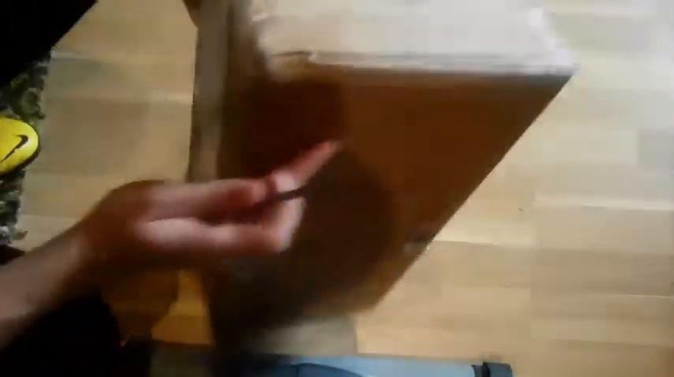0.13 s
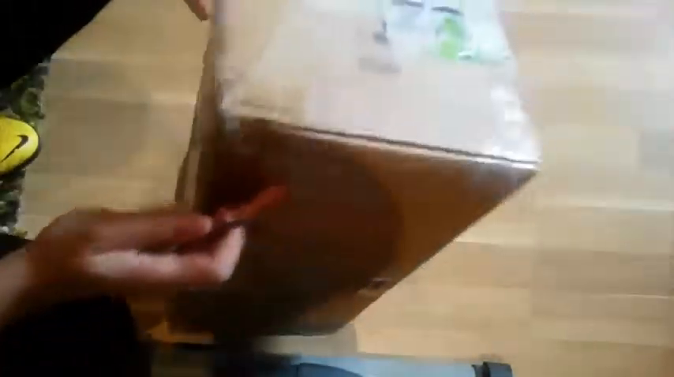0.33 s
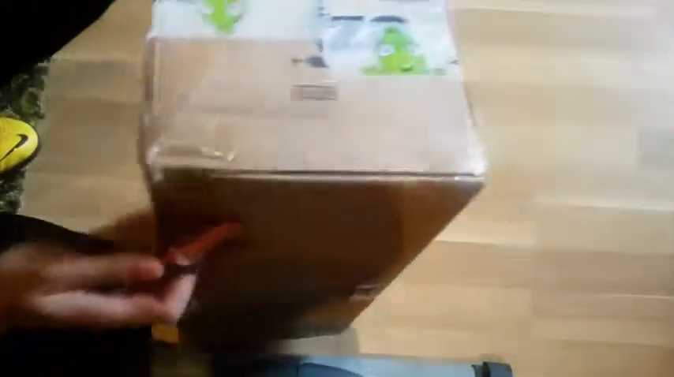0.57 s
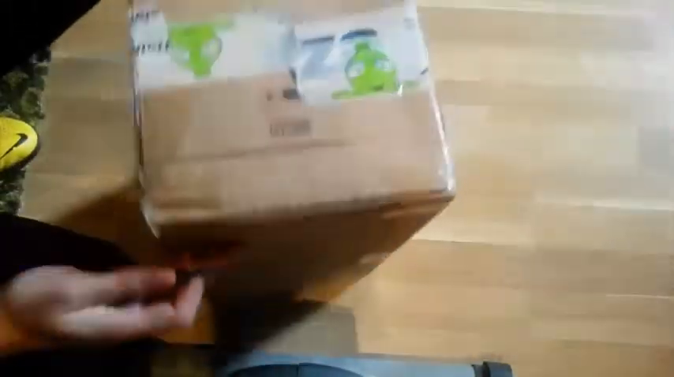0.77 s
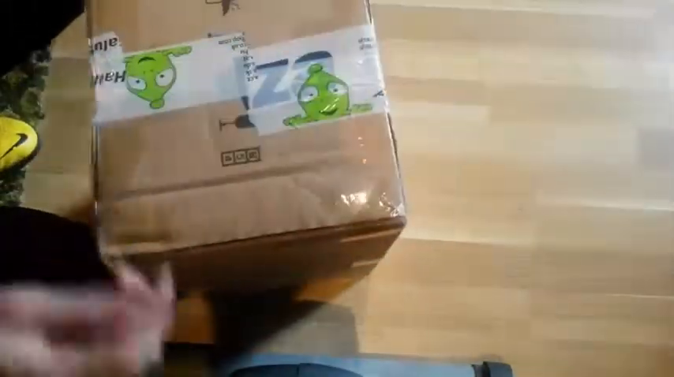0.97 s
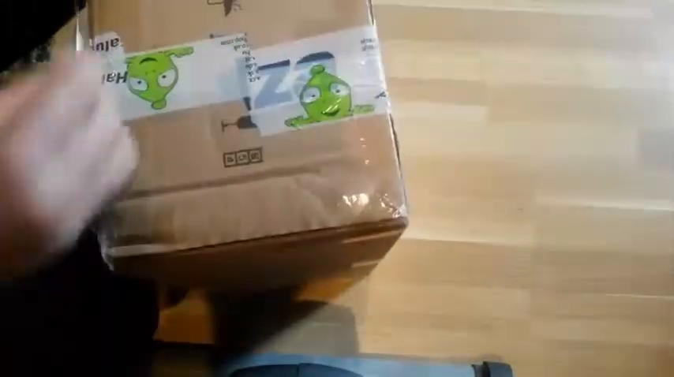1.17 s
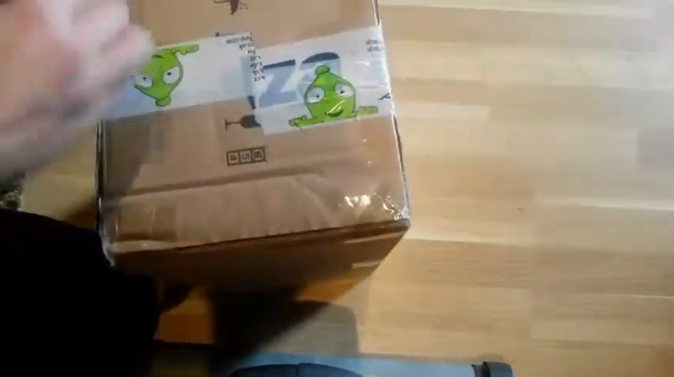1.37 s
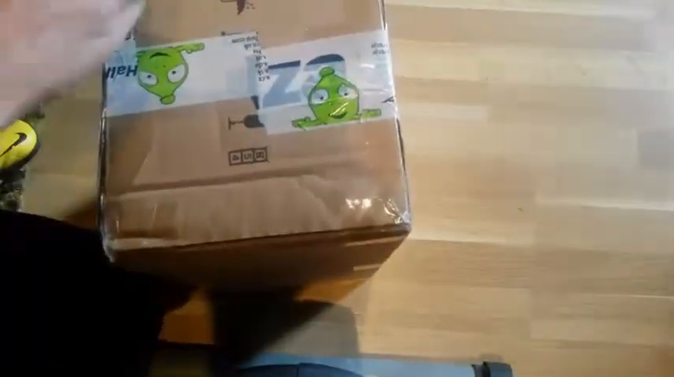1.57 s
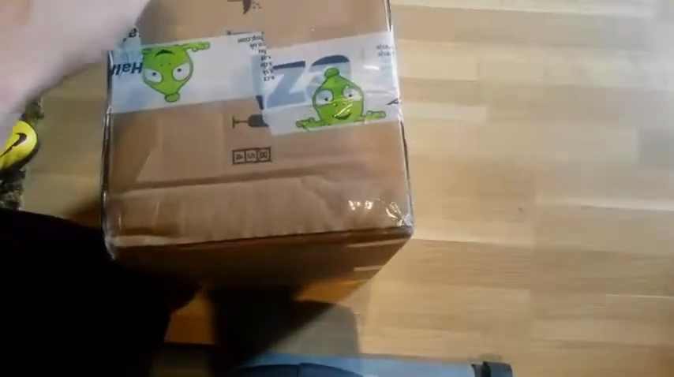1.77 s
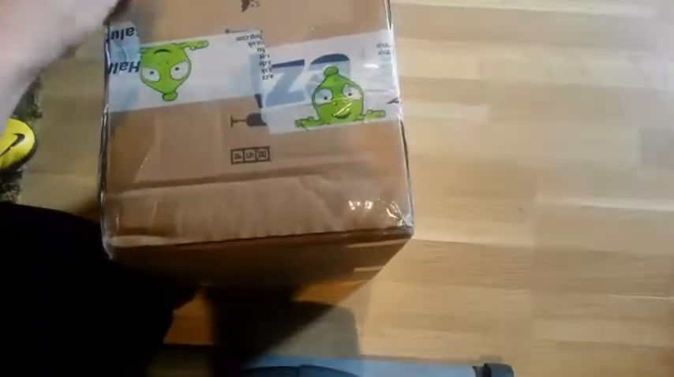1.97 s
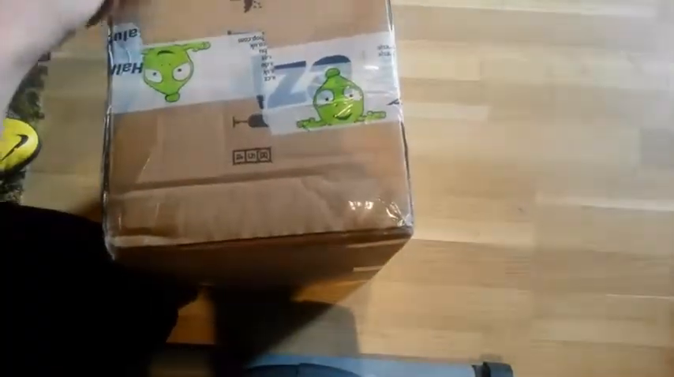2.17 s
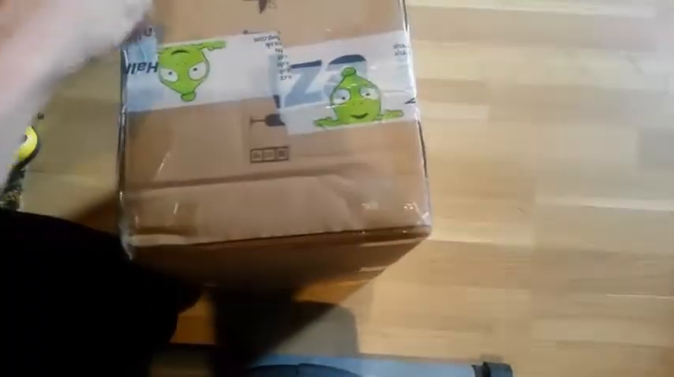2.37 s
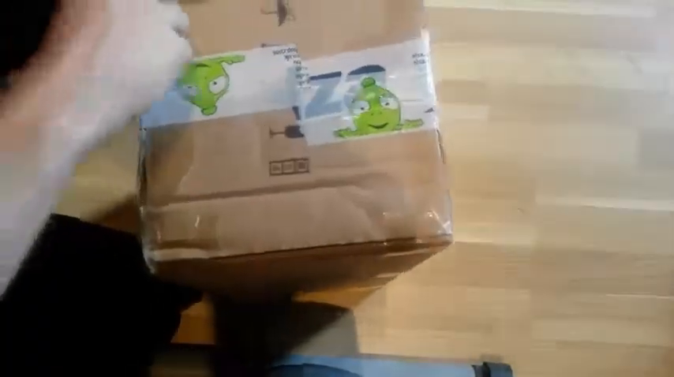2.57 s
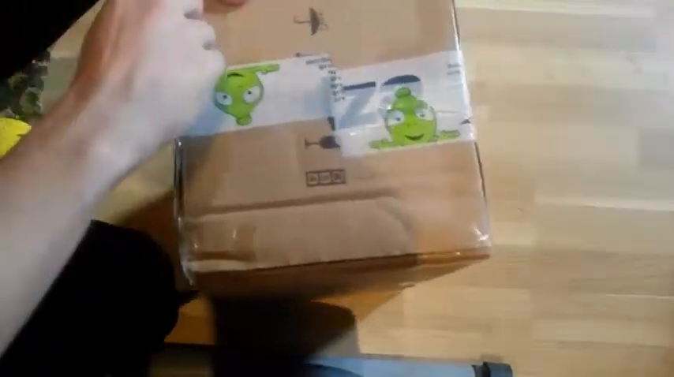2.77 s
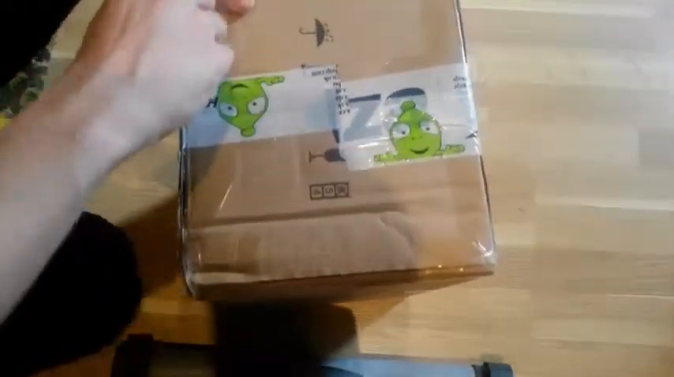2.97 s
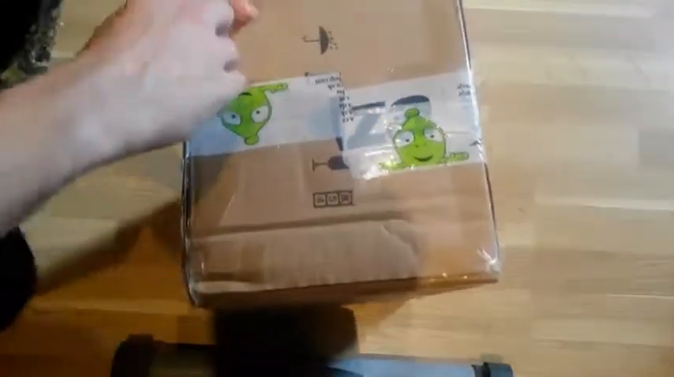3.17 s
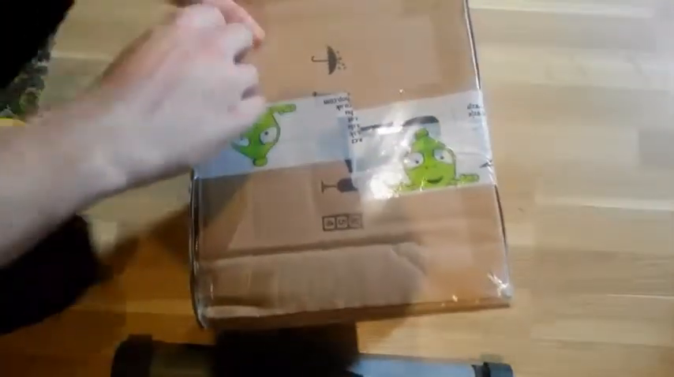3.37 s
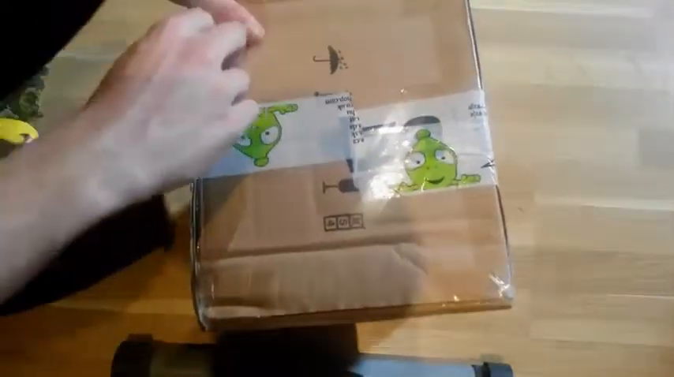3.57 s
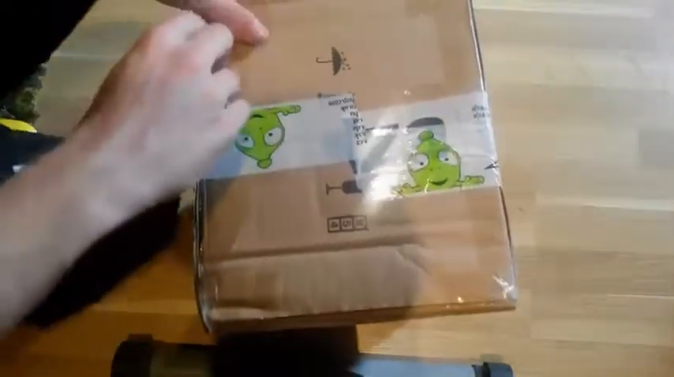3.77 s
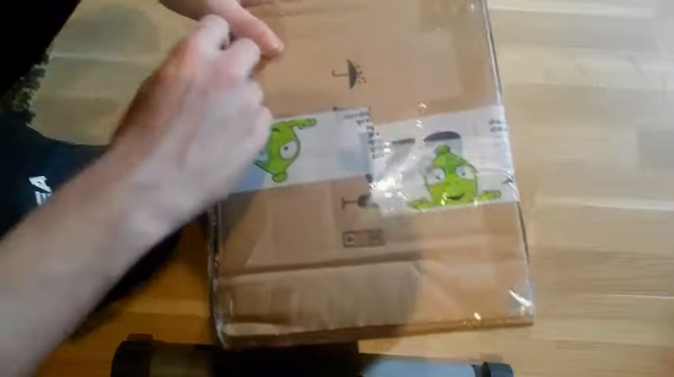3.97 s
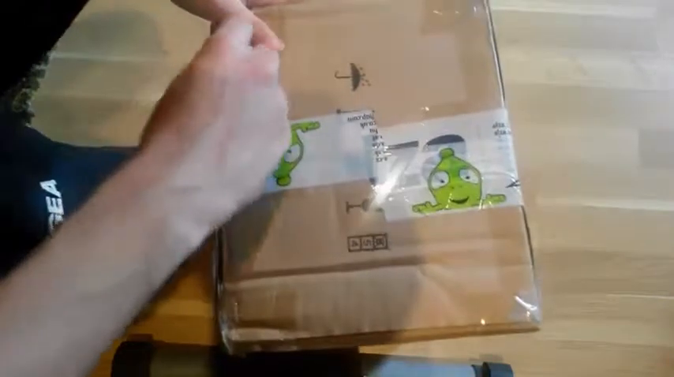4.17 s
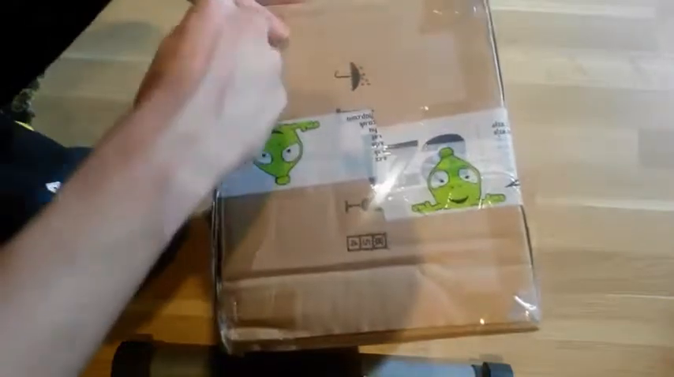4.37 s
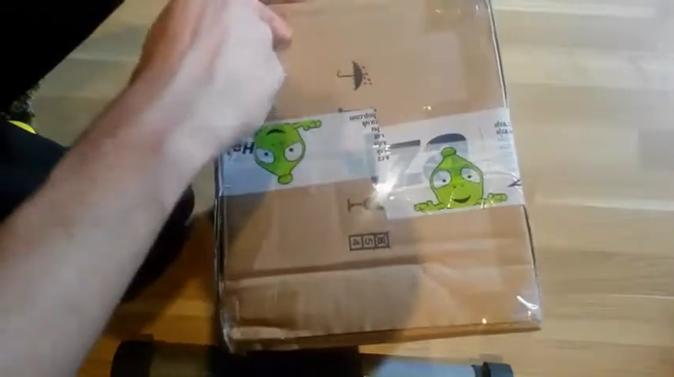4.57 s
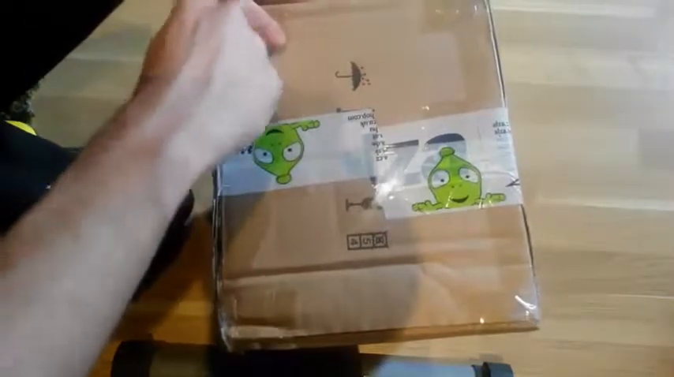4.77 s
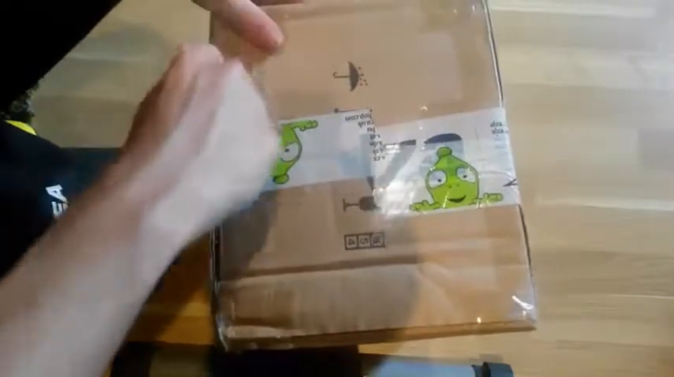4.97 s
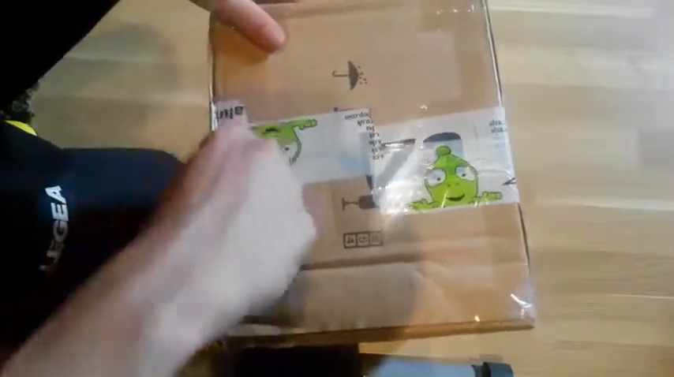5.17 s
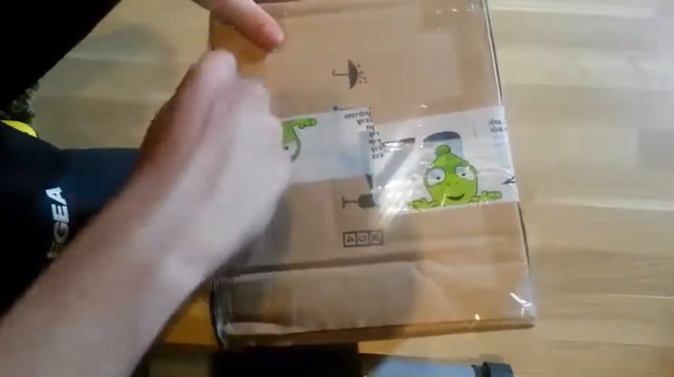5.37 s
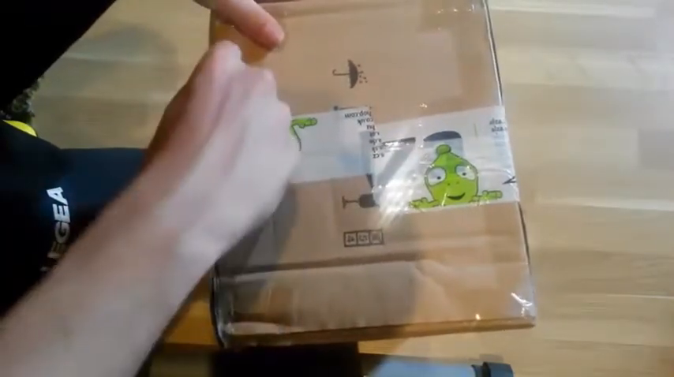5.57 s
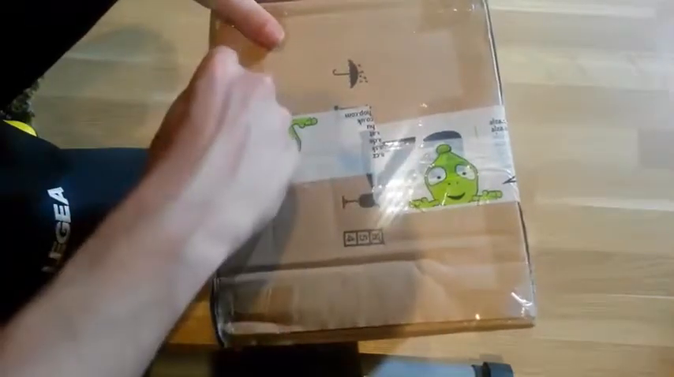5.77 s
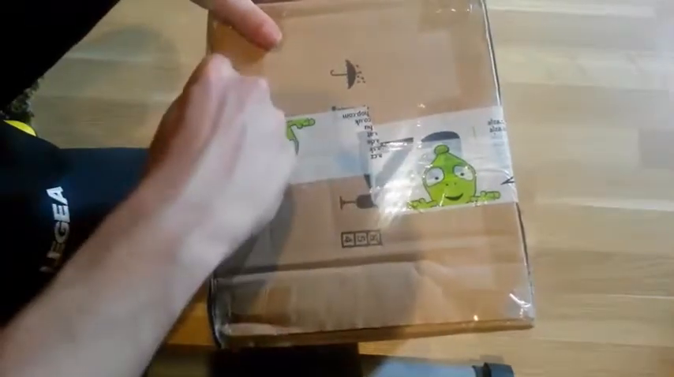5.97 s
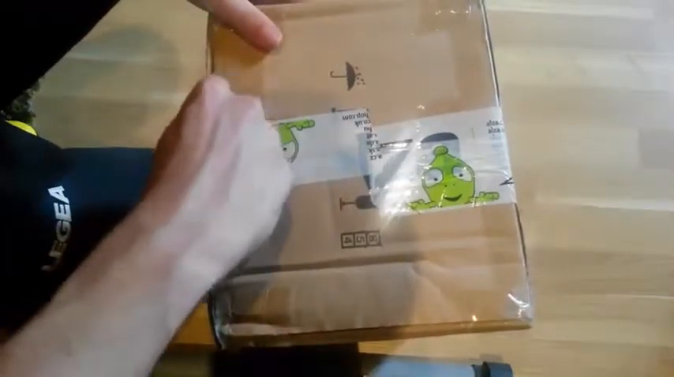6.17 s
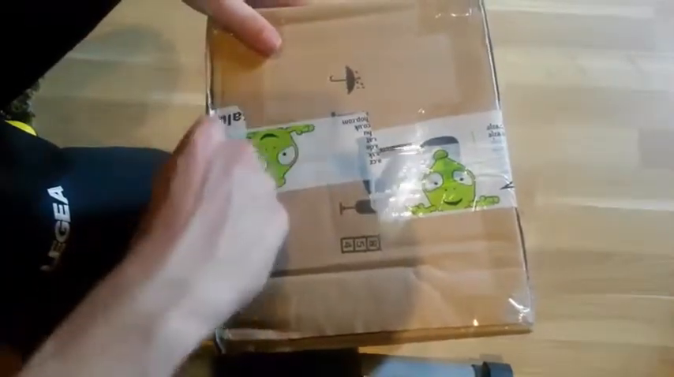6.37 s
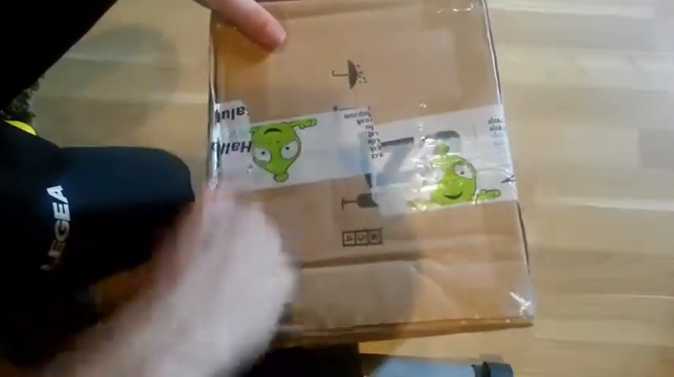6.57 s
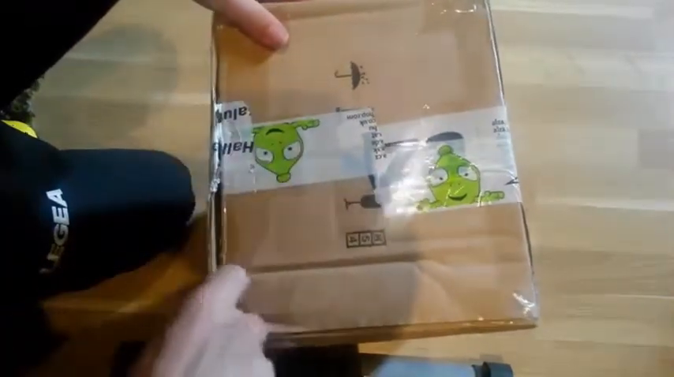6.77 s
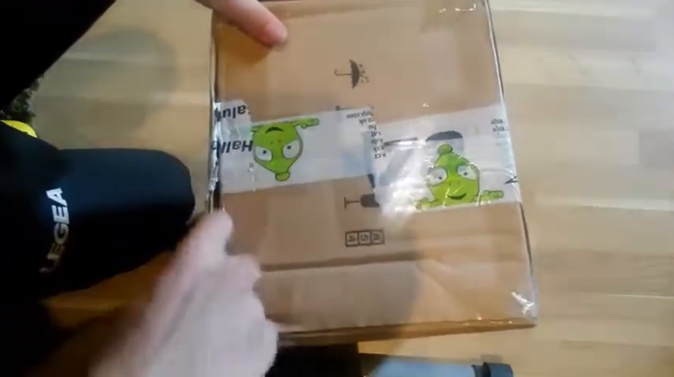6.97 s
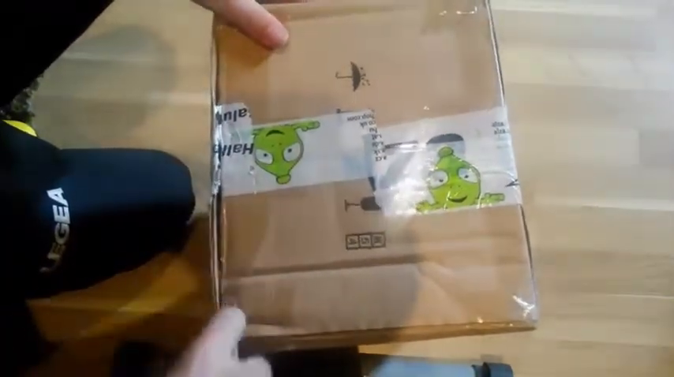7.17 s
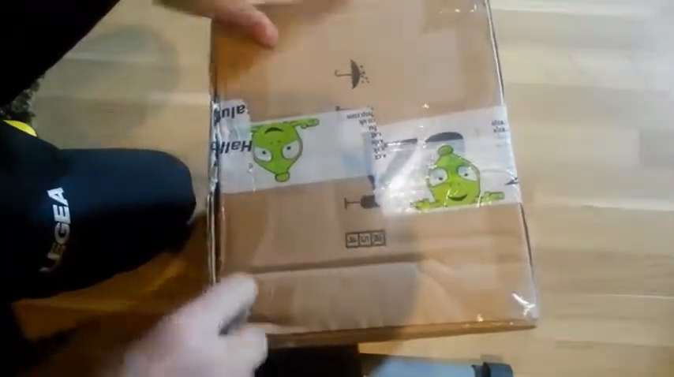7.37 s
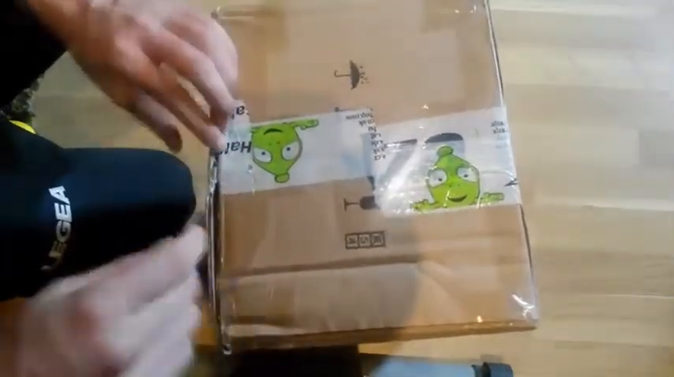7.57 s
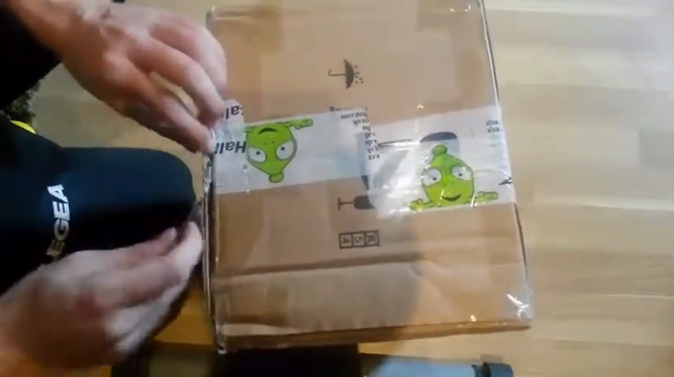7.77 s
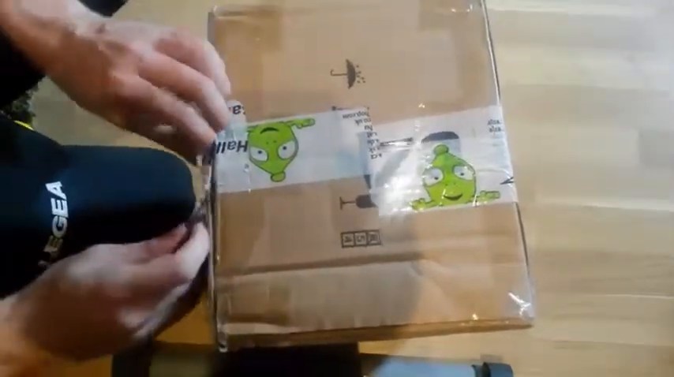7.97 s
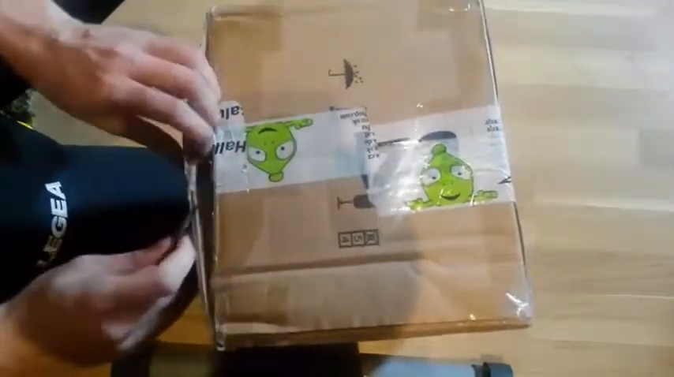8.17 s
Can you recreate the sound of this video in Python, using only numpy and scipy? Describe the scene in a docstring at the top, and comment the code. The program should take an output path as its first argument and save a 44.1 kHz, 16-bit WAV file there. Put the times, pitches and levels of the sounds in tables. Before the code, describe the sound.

A taped cardboard parcel is shoved round on a wooden floor for the first 1.3 seconds, with soft drags, low bumps and small tape snaps. At 1.3 seconds one sharp static pop hits the right side. Hands then sweep faintly over the lid until 4.3 seconds, with a few ticks and one faint squeak near 3.4. Fingers rub and pick at the plastic tape. At 5.2 seconds a small blade rips it in a loud, crackling burst that drums the hollow box, with a brief squeak. More loud rips and snaps come from 6.5 to 6.9 seconds, with a second squeak. Light scraping and clicks follow, then a short rip near 7.6 and sharp snaps around 8.0 and 8.2. The parcel is close and slightly left, in a small, quiet room.

```python
"""A taped cardboard parcel is shoved round on a wooden floor in a small room: drag, bumps, tape snaps.
At 1.3 s one static pop hits the right channel. Hands sweep the lid until 4.3 s, with one faint squeak.
Fingers then rub and pick at the plastic tape. From 5.2 s a small blade rips it in short, crackling
bursts that drum the hollow box and twice set a panel squeaking."""
import sys
import numpy as np
from scipy import signal
from scipy.fft import rfft, irfft, next_fast_len
from scipy.io import wavfile
from scipy.ndimage import map_coordinates

SR = 44100
rng = np.random.default_rng(int(sys.argv[2]) if len(sys.argv) > 2 else 0)


def dump_mix(stems):
    """Bounce the given channels to the path in sys.argv[1] as a 16-bit WAV at rate SR."""
    frames = np.atleast_2d(stems).T  # one column per channel
    limited = np.clip(frames, -1, 1)  # hard clip at full scale
    pcm = np.round(limited * 32767).astype(np.int16)
    wavfile.write(sys.argv[1], SR, pcm)


N = 362943

# Event levels are relative within each source.
# parcel turned on the floor: middle_s, length_s, drag_db, rumble_db
SHOVES = [(.02, 0.46, -47, -50.5), (.23, 0.35, -47, -50), (.39, 0.41, -42.5, -48), (.635, 0.24, -49, -57.5),
          (.785, 0.19, -49, -51.5), (1.01, 0.4, -45.5, -48.5), (1.14, 0.18, -47, -53),
          (1.26, 0.22, -56.5, -58)]
# tape snaps and crinkles: start_s, crack_db, knock_db, tilt_db_per_octave
SNAPS = [(0.097, -42, -38.5, -2), (0.7529, -32, -43, -2), (.765, -35, -55, 3), (0.7847, -32, -50, 6),
         (.8579, -42, -60, -2), (.9085, -47, -38, -3), (1.069, -35, -45.5, 2), (1.1751, -31.5, -47, -0.5),
         (1.482, -39, -60, -2), (2.1971, -34, -46, -1), (2.452, -40, -55, 3), (2.488, -36.5, -73, 3),
         (2.518, -30.5, -46, -1), (2.533, -33.5, -49, 1), (2.6664, -37, -33.5, -7), (3.81, -34, -59, 5),
         (3.84, -44, -69, -3), (4.461, -46, -67, 6), (4.5875, -36.5, -75, -6.5), (4.6121, -36.5, -77, -2),
         (4.798, -30, -66, -4), (4.8325, -31, -66, 3.5), (4.9157, -32, -55, 4.5), (5.0789, -25, -41, 6.5),
         (5.1989, -9.5, -15.5, -3.5), (5.225, -19.5, -30.5, -3), (5.2456, -13, -24, -2.5),
         (5.258, -10, -20.5, -3), (5.263, -15, -25.5, -3), (5.277, -7.5, -27, -1.5),
         (5.2855, -18.5, -27.5, -5.5), (5.303, -13.5, -19.5, -5), (5.3131, -11.5, -14.5, -2),
         (5.345, -11.5, -20, 1), (5.3494, -18.5, -36, 1.5), (6.0761, -36, -61.5, 3),
         (6.1716, -20.5, -30.5, -0.5), (6.411, -43, -56, 4), (6.4324, -34, -50, 2), (6.456, -26, -26, 3),
         (6.4615, -7, -18.5, -1.5), (6.6757, -13.5, -11.5, -1), (6.682, -18.5, -19.5, -2),
         (6.7432, -7, -19, -3.5), (6.754, -9, -30, -1), (6.7608, -13.5, -36, -3), (6.7903, -14, -34, -2),
         (6.8502, -14, -23, 1), (7.2409, -22, -25, 1.5), (7.318, -23, -29.5, -1.5), (7.413, -30.5, -65, 1),
         (7.5, -34, -52, 4), (7.5456, -20, -38.5, 3), (7.5544, -24, -43, 2), (7.564, -23, -55, 3),
         (7.5775, -10.5, -43.5, 1.5), (7.5813, -18, -57, 3.5), (7.5911, -14.5, -49, 0.5),
         (7.755, -45, -39, -1.5), (7.89, -21.5, -47, 1), (8.0216, -15.5, -27, -0.5),
         (8.0293, -21.5, -34, 2.5), (8.115, -32.5, -69, 1), (8.1871, -14, -32, 1)]
# soft contacts with floor and hands: start_s, level_db, pitch_hz
BUMPS = [(0.099, -32, 280), (0.109, -34, 400), (0.123, -31, 477), (.269, -24, 174), (0.291, -30, 146),
         (0.405, -28, 98), (.596, -35.5, 218), (0.727, -22.5, 172), (0.743, -32.5, 200), (0.908, -28, 300),
         (0.934, -31, 200), (0.979, -25, 91.6), (2.518, -45, 215), (3.486, -40.5, 198),
         (3.927, -49.5, 94.6), (4.868, -35, 135.6), (5.284, -18.5, 248), (5.314, -23, 290.4),
         (6.234, -34.5, 930), (6.465, -21, 986), (6.468, -29, 120), (6.677, -13.5, 440), (6.768, -21, 457),
         (6.815, -19, 126.6), (6.868, -27, 148), (7.757, -34, 132), (8.023, -28, 138), (8.189, -21, 330)]
# fingers and blade along the tape: start_s, length_s, hiss_db, rumble_db
SCRAPES = [(.28, 0.024, -39, -44), (.4, 0.036, -32, -39.5), (.57, 0.025, -51, -52.5),
           (.968, 0.047, -37, -41), (1.168, 0.02, -41.5, -49), (1.478, 0.028, -55.5, -67.5),
           (1.69, 0.025, -61.5, -77), (2.165, 0.033, -81, -65.5), (4.385, 0.036, -67, -74),
           (4.415, 0.024, -59.5, -61), (4.46, 0.21, -68.5, -72.5), (4.575, 0.039, -52.5, -72),
           (4.775, .02, -69, -74), (4.81, .05, -60, -66.5), (4.86, 0.028, -42, -52.5),
           (4.93, .03, -64, -60), (4.965, .1, -44.5, -47.5), (5.07, 0.031, -44.5, -46),
           (5.12, 0.032, -53, -54), (6.335, 0.03, -59.5, -63), (6.39, 0.12, -59.5, -65),
           (6.615, 0.067, -59.5, -61), (6.88, 0.059, -44, -47.5), (6.97, 0.084, -55, -59),
           (7.05, 0.052, -44, -53), (7.122, 0.03, -53, -62), (7.16, 0.053, -40, -52),
           (7.21, 0.13, -36.5, -38), (7.345, 0.044, -47, -54), (7.41, 0.13, -50.5, -57),
           (7.746, 0.017, -50.5, -55.5), (7.928, 0.022, -63, -56), (7.99, 0.052, -52.5, -49),
           (8.04, 0.057, -66, -54.5)]
# hand over the lid: middle_s, length_s, hiss_db, rumble_db
SWEEPS = [(1.42, 0.6, -69.5, -72), (1.76, 0.39, -68, -76.5), (1.92, 0.21, -70.5, -77.5),
          (2.34, 0.49, -65, -70.5), (2.62, 0.55, -58, -61), (2.82, 0.59, -45, -56.5),
          (3.06, 0.28, -48, -59), (3.24, 0.94, -68.5, -70.5), (3.485, 0.37, -51, -57.5),
          (3.71, 0.15, -70.5, -74.5), (3.87, 0.34, -67, -71.5), (4.15, 0.37, -52, -59.5)]
# stick-slip of the tape: start_s, length_s, pitch_hz, level_db
SQUEAKS = [(3.388, 0.085, 694, -55), (5.216, 0.065, 986, -27), (6.695, 0.037, 460, -29)]
# tape rips: start_s, length_s, crackle_db, box_db
RIPS = [(5.197, 0.03, -37, -36.5), (5.222, 0.13, -26, -27.5), (6.455, 0.06, -33.5, -34),
        (6.676, 0.0063, -26, -42), (6.708, 0.0074, -30, -45), (6.738, 0.023, -23.5, -26),
        (6.765, 0.1025, -25, -28.5), (7.546, 0.03, -38.5, -51.5), (7.567, 0.027, -34.5, -38),
        (8.187, 0.03, -46, -37.5)]

# modes of the panels and enclosed air: pitch_hz, level_db, t60_s
BOX_MODES = [(125, -12, 0.15), (232, -12.5, .07), (287, -19, .06), (436, -4, 0.039), (461.3, 1, 0.039),
             (604, -14.5, 0.021), (845, -3, 0.023), (921, 5, 0.035), (1018, -3, 0.053), (1067, -3, 0.02)]
# spectra: frequency_hz, density_db
BACKGROUND_SPECTRUM = [(20, 1.5), (35, -15), (120, -14), (450, -20.5), (1300, -25), (6000, -26.5),
                       (15000, -30)]
FLOOR_DRAG_SPECTRUM = [(530, -32), (900, -9.5), (1260, -7.5), (1750, -7.5), (2600, -5.5), (3700, -8),
                       (6800, 0.5), (8200, -3), (9400, -7.5), (14500, -11.5), (15400, -28), (16000, -44)]
PANEL_RUMBLE_SPECTRUM = [(25, -31), (50, -13), (90, -2), (180, -4), (320, -4), (500, -4.5), (950, -6),
                         (1200, -18.5), (2000, -45.5)]
TAPE_CRACK_SPECTRUM = [(500, -23.5), (950, -12.5), (1300, -10.5), (1750, -9), (2700, -4), (3500, -7.5),
                       (4500, -3), (6500, 0), (8200, -4.5), (9400, -7.5), (14500, -12.5), (16000, -35)]
TAPE_RUB_SPECTRUM = [(530, -38), (900, -8.5), (1200, -22.5), (1290, -16.5), (2860, -11), (3380, -14),
                     (4520, -10), (7490, -8.5), (14700, -23), (16000, -38)]
HAND_HISS_SPECTRUM = [(530, -36.5), (900, -6.5), (1090, -9), (1530, -8), (2450, -8), (8150, -1),
                      (9650, -8.5), (12300, -8), (14400, -14), (15200, -24.5), (16000, -57.5)]
BOX_DRUM_SPECTRUM = [(25, -38.5), (60, -11.5), (115, 4), (200, -2), (280, -3.5), (360, -6.5), (460, -0.5),
                     (700, -4.5), (950, -2), (1250, -20), (2000, -47.5)]

# room decay: frequency_hz, t60_s
ROOM_DECAY = [(100, 0.4), (500, 0.28), (2000, 0.3), (6000, 0.28), (15000, 0.24)]
# left-right likeness: frequency_hz, correlation
STEREO_LIKENESS = [(100, 0.81), (500, 0.92), (1000, 0.33), (3000, 0.15), (12000, 0.083)]
# channel balance: frequency_hz, left_minus_right_db
STEREO_BALANCE = [(100, 3), (500, 5), (1000, 4.5), (4000, 4), (8000, 1.3), (13000, -1.5)]


def amp(db):
    """Decibels to gain."""
    return 10 ** (np.asarray(db) / 20)


def unit(x):
    """x at rms 1."""
    return x / np.sqrt(np.mean(x ** 2) + 1e-20)


def along(points, hz):
    """Interpolate a table on a log frequency axis."""
    knots_hz, values = np.transpose(points)
    return np.interp(np.log(hz + 1), np.log(knots_hz + 1), values)


def filtered(x, response):
    """Apply the gain response(hz)."""
    n = x.shape[-1]
    size = next_fast_len(n + 8192)
    return irfft(rfft(x, size) * response(np.fft.rfftfreq(size, 1 / SR)), size)[..., :n]


def impulse(spectrum, size=1024):
    """Minimum-phase impulse response of a spectrum."""
    cepstrum = irfft(np.log(amp(along(spectrum, np.fft.rfftfreq(size, 1 / SR)))))
    cepstrum[1:size // 2] *= 2
    cepstrum[size // 2 + 1:] = 0
    return irfft(np.exp(rfft(cepstrum)))


def add(track, start_s, sound):
    """Mix a sound into a track."""
    part = track[..., max(round(start_s * SR), 0):][..., :sound.shape[-1]]
    part += sound[..., :part.shape[-1]]


def wobble(rate_hz):
    """Random curve, linear between knots."""
    knots = rng.standard_normal(int(N * rate_hz / SR) + 4)
    return map_coordinates(knots, [np.arange(N) * rate_hz / SR], order=1)


def stereo(pair):
    """Two unrelated signals to left and right: alike in the bass, less so in the treble."""
    def weights(hz):
        angle = np.arccos(along(STEREO_LIKENESS, hz)) / 2
        return np.array([np.cos(angle), np.sin(angle)])
    mid, side = filtered(pair, weights)
    return np.array([mid + side, mid - side])


def grains(spectrum, rate_hz, spread_db, rush_db, clump_hz, clump_db):
    """Clumped micro-slips over a smooth rush, shaped by a spectrum; rms 1."""
    hits = rng.random(N) < rate_hz / SR
    sizes = hits * amp(spread_db * np.clip(rng.standard_normal(N), -2, 2))
    slips = unit(sizes * rng.standard_normal((2, N))) + amp(rush_db) * rng.standard_normal((2, N))
    slips *= amp(clump_db * wobble(clump_hz))
    return unit(stereo(signal.oaconvolve(slips, impulse(spectrum, size=4096)[None], axes=1)[:, :N]))


def wandering(x, depth_db, width_hz=260, life_s=0.022):
    """The contact spot moves, so narrow sheet resonances come and go; rms 1."""
    bins = signal.stft(x, nperseg=512)[2]
    spacing = np.array([width_hz * 512 / SR, life_s * SR / 256])
    knots = rng.standard_normal(bins.shape[1:])
    field = map_coordinates(knots, np.indices(knots.shape) / spacing[:, None, None], order=1)
    return unit(signal.istft(bins * amp(depth_db * unit(field)), nperseg=512)[1][:, :N])


def glides(rows, speed_exponent=1.6):
    """Treble and bass gain of smooth moves: friction follows one arch of speed."""
    power = np.zeros((2, N))
    for middle_s, length_s, *levels_db in rows:
        phase = (np.arange(N) / SR - middle_s) / length_s
        moving = np.abs(phase) < 0.5
        speed = np.cos(np.pi * phase[moving])
        power[:, moving] += (amp(levels_db)[:, None] * speed ** speed_exponent) ** 2
    return np.sqrt(power)


def pulls(rows, attack_s, sag_db_per_s, release_t60_s):
    """Treble and bass gain of sudden pulls: attack, sagging hold, release."""
    power = np.zeros((2, N))
    for start_s, length_s, *levels_db in rows:
        t = np.arange(int((length_s + release_t60_s) * SR)) / SR
        release_db = 60 * np.maximum(t - length_s, 0) / release_t60_s
        envelope = np.minimum(t / attack_s, 1) * amp(-sag_db_per_s * t - release_db)
        add(power, start_s, (amp(levels_db)[:, None] * envelope) ** 2)
    return np.sqrt(power)


def background():
    """Steady, bass-heavy noise of a quiet room; rms 1."""
    noise = rng.standard_normal((2, N))
    return unit(stereo(filtered(noise, lambda hz: amp(along(BACKGROUND_SPECTRUM, hz)))))


def sliding(hiss_left_minus_right_db=-0.8):
    """Cardboard drags on the floor and rasps under the hands; its panels rumble."""
    drag_gain, floor_rumble_gain = glides(SHOVES)
    hiss_gain, hand_rumble_gain = glides(SWEEPS)
    drag = grains(FLOOR_DRAG_SPECTRUM, rate_hz=1500, spread_db=3, rush_db=0, clump_hz=110, clump_db=1.9)
    drag = wandering(drag, depth_db=2)
    hiss = grains(HAND_HISS_SPECTRUM, rate_hz=2500, spread_db=2.5, rush_db=0, clump_hz=120, clump_db=1.3)
    hiss = wandering(hiss, depth_db=2.2)
    panels = grains(PANEL_RUMBLE_SPECTRUM, rate_hz=700, spread_db=1.5, rush_db=0.5,
                    clump_hz=40, clump_db=0.5)
    pan = amp(hiss_left_minus_right_db * np.array([[0.5], [-0.5]]))
    friction = drag_gain * drag + pan * hiss_gain * hiss
    return amp(1.5) * friction + amp(-1) * (floor_rumble_gain + hand_rumble_gain) * panels


def snapping(give_s=0.00091, front_db=3.5, front_t60_s=0.003, pivot_hz=5500):
    """The tape gives, then lets go: a crack, a brief flutter and a knock in the box modes."""
    cracks, knocks, t = np.zeros((2, N)), np.zeros(N), np.arange(SR // 8) / SR
    film = impulse(TAPE_CRACK_SPECTRUM)[None]
    mode_hz, mode_db, mode_t60_s = np.transpose(BOX_MODES)[:, :, None]
    rise = np.minimum(t / give_s, 1) ** 4
    after_s = np.maximum(t - give_s, 0)
    front = amp(front_db - 60 * after_s / front_t60_s)
    for start_s, crack_db, knock_db, tilt_db_per_octave in SNAPS:
        stretch = amp(0.34 * (crack_db + 23.5))  # louder snaps run further and last longer
        body_t60_s, flutter_t60_s = 0.015 * stretch, 0.064 * stretch
        body = amp(-60 * after_s / body_t60_s)
        flutter = amp(-15 - 60 * after_s / flutter_t60_s)
        burst = rise * (front + body + flutter) * rng.standard_normal((2, len(t)))
        crack = signal.fftconvolve(burst, film, axes=1)
        # small creases are brighter than long tears
        crack = filtered(crack, lambda hz: amp(tilt_db_per_octave * np.log2(hz.clip(1000) / pivot_hz)))
        add(cracks, start_s, amp(crack_db + 14) * crack / np.linalg.norm(crack))
        # each spot on the lid drives the modes differently
        strength, detune = rng.standard_normal((2, len(BOX_MODES), 1))
        sign = rng.choice([-1, 1], (len(BOX_MODES), 1))
        modes = sign * np.sin(2 * np.pi * mode_hz * (1 + 0.026 * detune) * t)
        ring = np.sum(amp(mode_db + 2 * strength - 60 * t / mode_t60_s) * modes, axis=0)
        add(knocks, start_s + give_s, amp(knock_db + 15.5) * ring / np.linalg.norm(ring))
    return stereo(cracks) + knocks


def bumping(ring_cycles=18, max_t60_s=0.085, attack_s=0.0007, scuff_t60_s=0.045, relax_s=0.005):
    """A soft contact flexes one panel and scuffs it; low panels ring longer and scuff duller."""
    out, t = np.zeros(N), np.arange(SR // 5) / SR
    rise = 1 - np.exp(-t / attack_s)
    # a fresh dent is stiffer: pitch starts 7 % sharp, then relaxes
    warped_s = t + 0.07 * relax_s * (1 - np.exp(-t / relax_s))
    for start_s, level_db, pitch_hz in BUMPS:
        t60_s = min(ring_cycles / pitch_hz, max_t60_s)
        flex = amp(-60 * t / t60_s) * np.sin(2 * np.pi * pitch_hz * warped_s)
        cutoff_hz = 2.5 * pitch_hz
        response = lambda hz: amp(along(PANEL_RUMBLE_SPECTRUM, hz)) / np.hypot(1, (hz / cutoff_hz) ** 2)
        scuff = amp(-60 * t / scuff_t60_s) * unit(filtered(rng.standard_normal(len(t)), response))
        add(out, start_s, amp(level_db) * rise * (amp(-5) * flex + amp(-10) * scuff))
    return out


def rubbing():
    """Skin and steel catch on the tape, shaking film and cardboard together."""
    hiss_gain, rumble_gain = pulls(SCRAPES, attack_s=0.014, sag_db_per_s=35, release_t60_s=0.098)
    film = grains(TAPE_RUB_SPECTRUM, rate_hz=3500, spread_db=2.5, rush_db=2, clump_hz=130, clump_db=1.3)
    film = wandering(film, depth_db=2.2)
    panels = grains(PANEL_RUMBLE_SPECTRUM, rate_hz=260, spread_db=2, rush_db=1.5,
                    clump_hz=77, clump_db=1)
    return amp(0.5) * hiss_gain * film + rumble_gain * panels


def static_pop(start_s=1.276, peak_db=-2.5, corner_hz=88, damping=0.72):
    """A voltage step in the right input, drained by its bass cut with one undershoot."""
    out, t = np.zeros((2, N)), np.arange(SR // 20) / SR
    lag = np.arcsin(damping)
    phase = 2 * np.pi * corner_hz * t
    pulse = np.exp(-damping * phase) * np.cos(np.cos(lag) * phase + lag) / np.cos(lag)
    add(out[1], start_s, amp(peak_db) * pulse)
    return out


def squeaking(waver=0.085, rough_db=5):
    """Dragging tape slips unevenly and keeps one panel ringing; it swells and fades with the pull."""
    out = np.zeros(N)
    pitch_ratio = 1 + waver * wobble(rate_hz=160)
    roughness = amp(rough_db * wobble(rate_hz=140))
    for start_s, length_s, pitch_hz, level_db in SQUEAKS:
        first, count = int(start_s * SR), int(length_s * SR)
        span = slice(first, first + count)
        ring = roughness[span] * np.sin(2 * np.pi * np.cumsum(pitch_hz * pitch_ratio[span]) / SR)
        add(out, start_s, amp(level_db) * unit(ring) * np.sin(np.linspace(0, np.pi, count)))
    return out


def ripping():
    """Stretched film lets go in tiny tears that drum the box while its tension runs down."""
    crackle_gain, box_gain = pulls(RIPS, attack_s=0.0038, sag_db_per_s=73, release_t60_s=0.05)
    film = grains(TAPE_CRACK_SPECTRUM, rate_hz=6000, spread_db=2.5, rush_db=-3,
                  clump_hz=450, clump_db=2.4)
    film = wandering(film, depth_db=1.8)
    panels = grains(BOX_DRUM_SPECTRUM, rate_hz=1100, spread_db=3, rush_db=-5, clump_hz=200, clump_db=1)
    return amp(-1.9) * crackle_gain * film + amp(-3.5) * box_gain * panels


def room(x, delay_s=0.003, blocks=24):
    """Short diffuse tail per channel, redrawn each block as hands and parcel move."""
    out, edges = np.zeros((2, N)), np.linspace(0, N, blocks + 1).astype(int)
    for first, end in zip(edges, edges[1:]):
        hz, t, bins = signal.stft(rng.standard_normal((2, SR // 2)), SR, nperseg=256)
        decay = amp(-60 * t / along(ROOM_DECAY, hz)[:, None])
        tail = signal.istft(bins * decay, SR, nperseg=256)[1][:, :SR // 3]
        tail /= np.linalg.norm(tail[0])
        add(out, first / SR + delay_s, signal.fftconvolve(x[:, first:end], tail, axes=1))
    return out


def microphone(x, corner_hz=50):
    """Left is louder except in the top treble; deep bass is cut."""
    bass_cut = signal.butter(2, corner_hz, "highpass", fs=SR, output="sos")
    panned = filtered(x, lambda hz: amp(np.outer([0.5, -0.5], along(STEREO_BALANCE, hz))))
    return signal.sosfilt(bass_cut, panned)


def scene():
    """The parcel lies close and a little left, in a quiet room."""
    parcel = sliding() + rubbing() + ripping() + snapping() + bumping() + squeaking()
    heard = microphone(parcel + amp(-6) * room(parcel))
    return heard + amp(-76.5) * background() + static_pop()


def record(dry):
    """Steep low-pass at the band limit."""
    cutoff_hz = 15600
    return filtered(dry, lambda hz: 1 / np.sqrt(1 + (hz / cutoff_hz) ** 120))


dry = scene()
out = record(dry)
dump_mix(out)
```